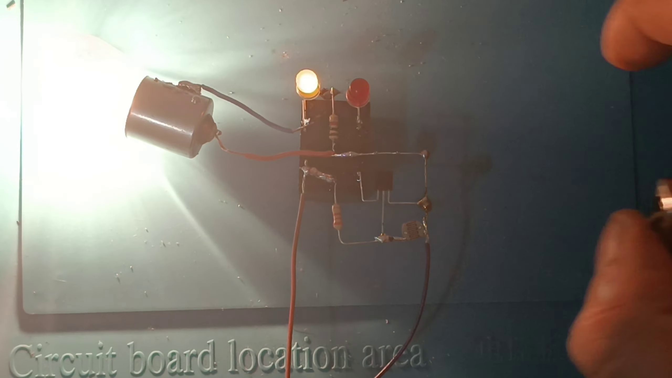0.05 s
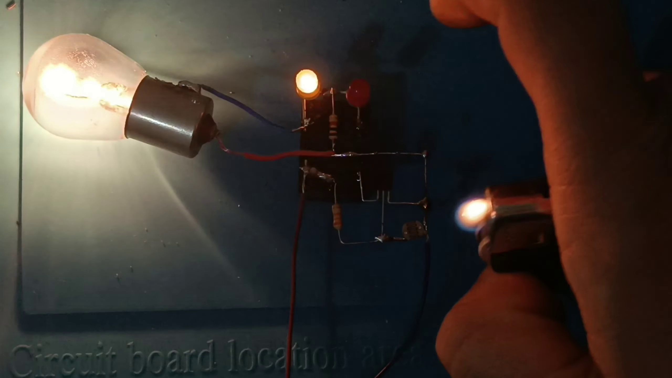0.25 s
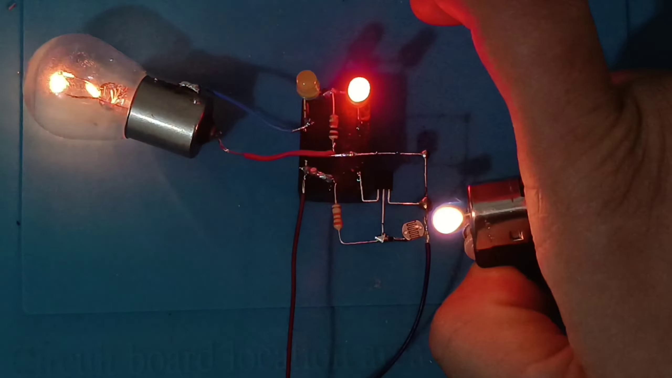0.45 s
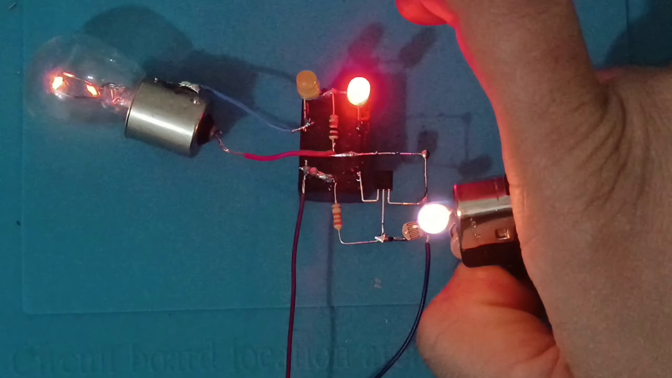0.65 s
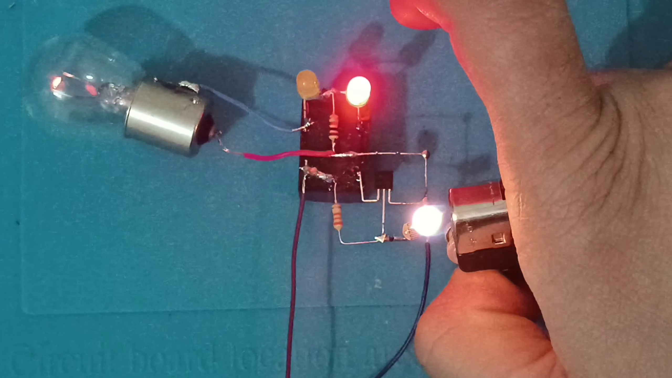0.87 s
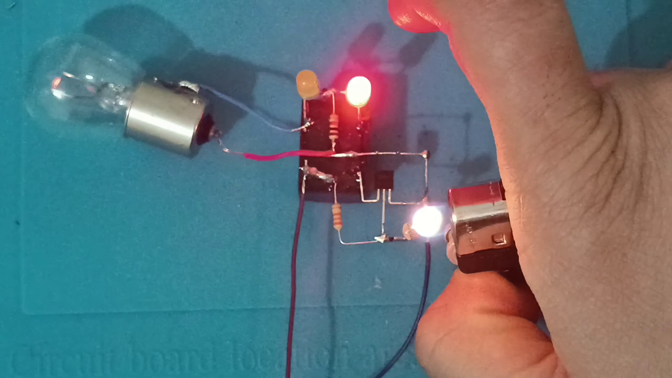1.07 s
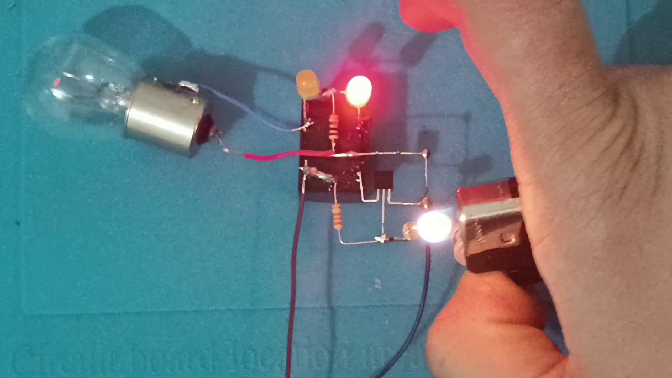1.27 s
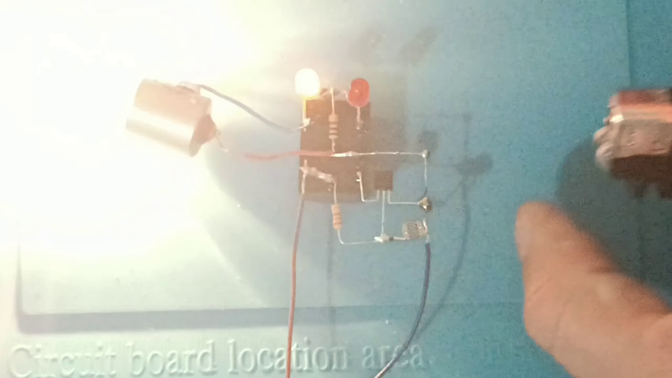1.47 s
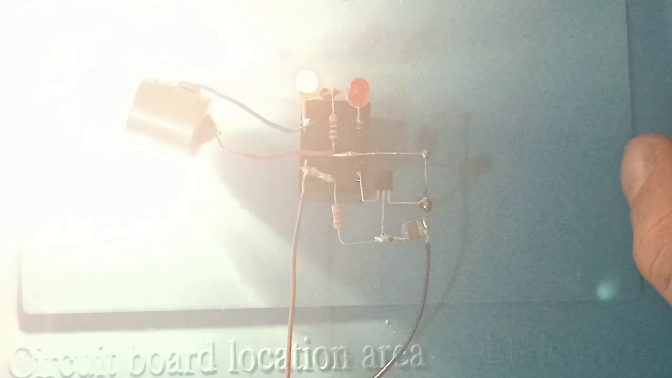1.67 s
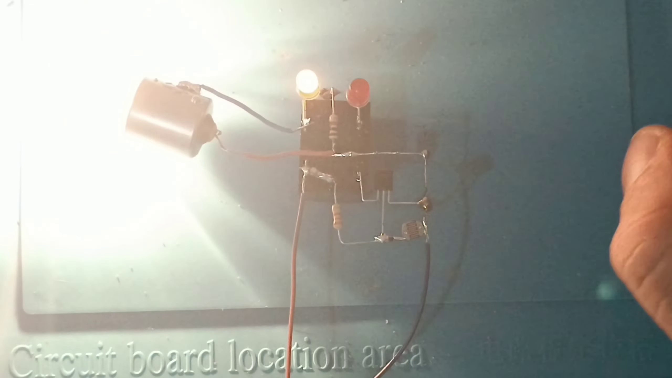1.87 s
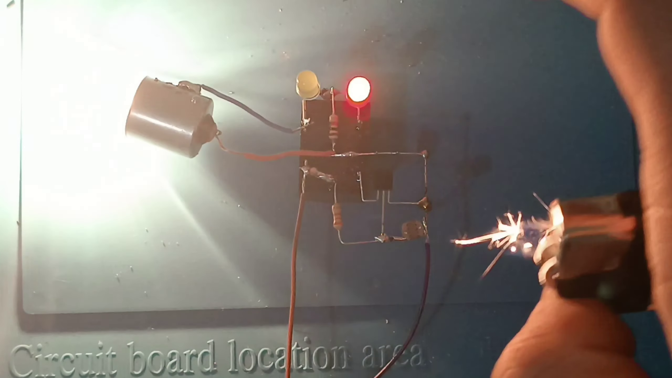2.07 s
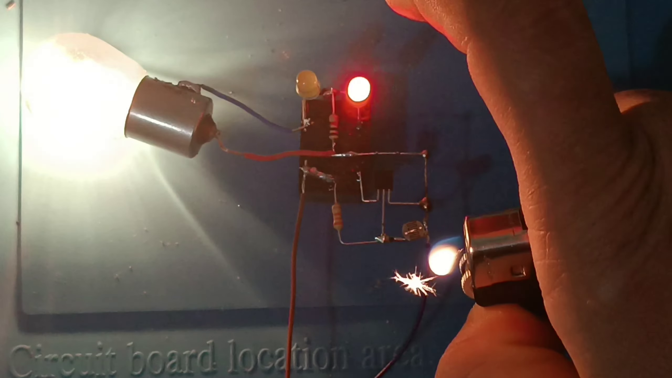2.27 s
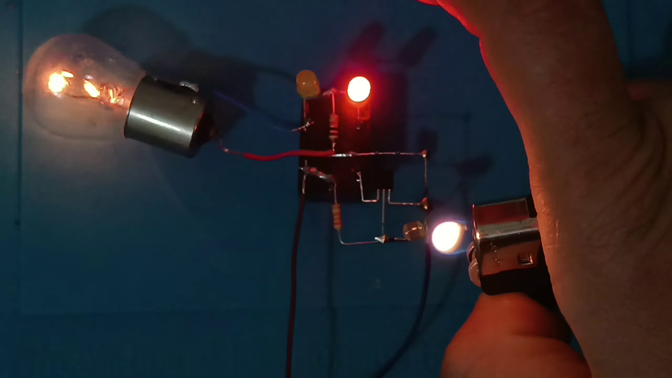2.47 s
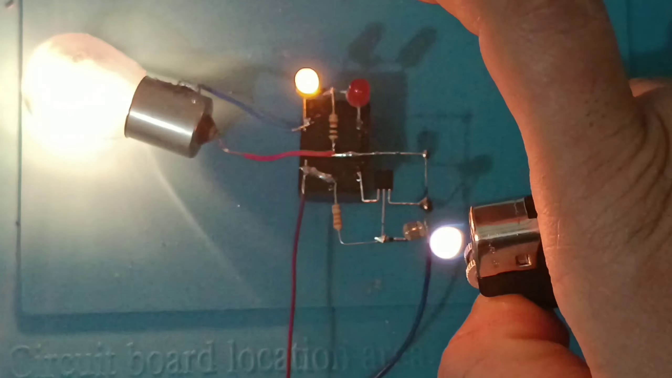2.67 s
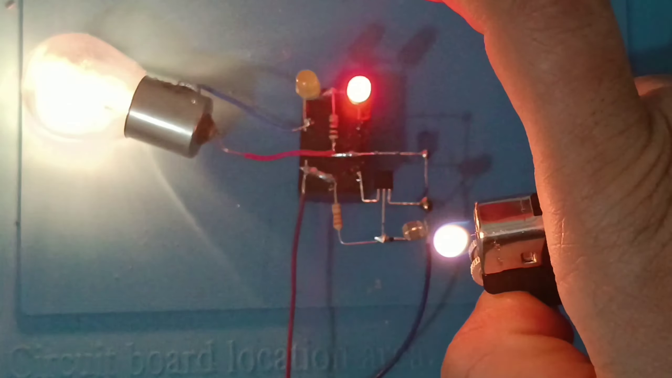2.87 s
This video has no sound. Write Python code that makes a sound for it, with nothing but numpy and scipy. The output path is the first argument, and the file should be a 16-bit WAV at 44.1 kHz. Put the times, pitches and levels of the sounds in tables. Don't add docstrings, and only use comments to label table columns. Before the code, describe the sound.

A flint lighter is struck close by at 0.2 seconds: short gritty scrape, sharp crack, low thumb thud on the table. Small dry relay clicks follow until 0.5. Quiet room hush, then a faint lever creak and clicks around 1.4, with a barely audible hollow hum. A second, slightly longer scrape comes at 2.16, a relay click at 2.26, lever snap at 2.35, then chattering relay clicks and low handling rumble from 2.6 to 2.9.

```python
import sys
import numpy as np
from scipy import signal
from scipy.fft import rfft, irfft, next_fast_len
from scipy.io import wavfile
from scipy.ndimage import map_coordinates

SR = 44100
rng = np.random.default_rng(int(sys.argv[2]) if len(sys.argv) > 2 else 0)


def boost(x):
    u = np.asarray(x, float) / 20
    return 10 ** u


def unload_audio(sound):
    columns = np.transpose(np.atleast_2d(sound))
    steps = np.round(np.clip(columns, -1, 1) * 32767)
    wavfile.write(sys.argv[1], SR, steps.astype(np.int16))


N = 127890


def unit(x):
    return x / np.sqrt(np.mean(x ** 2) + 1e-20)


def along(points, hz):
    f, v = np.transpose(points)
    return np.interp(np.log(hz + 1), np.log(f + 1), v)


def filtered(x, gain_db):
    m = 2 * next_fast_len(x.shape[-1] // 2 + 4096)
    gain = boost(gain_db(np.fft.rfftfreq(m, 1 / SR)))
    c = irfft(np.log(gain + 1e-6), m)
    c[1:m // 2] *= 2
    c[m // 2 + 1:] = 0
    return irfft(rfft(x, m) * np.exp(rfft(c)), m)[..., :x.shape[-1]]


def body(tone, peaks):
    def raw(f):
        rings = sum(db / (1 + (2 * (f - hz) / w) ** 2) for hz, w, db in peaks)
        return along(tone, f) + rings

    norm_db = 10 * np.log10(np.mean(boost(raw(np.linspace(0, SR / 2, 2048))) ** 2))
    return lambda f: raw(f) - norm_db


def add(track, s, sound):
    part = track[round(s * SR):][:len(sound)]
    part += sound[:len(part)]


def wobble(rate):
    knots = rng.standard_normal(int(N * rate / SR) + 4)
    return map_coordinates(knots, [np.arange(N) * rate / SR])


# (frequency [Hz], level per Hz [dB])
HUSH_TONE = [(25, -13), (65, -1), (300, -9), (700, -19), (2500, -21), (5000, -31.5), (9000, -42),
             (15300, -38.5)]
HUSH_DB, HUSH_LEFT_DB = -65.5, 1.04


def hush():
    noise = unit(filtered(rng.standard_normal((2, N)), lambda f: along(HUSH_TONE, f)))
    return boost(HUSH_DB + 4) * noise * boost([[HUSH_LEFT_DB / 2], [-HUSH_LEFT_DB / 2]])


# (time [s], level [dB])
HAND_PRESSURE = [(0, -66.5), (.15, -77), (1.25, -80), (1.42, -65), (1.65, -70), (1.8, -79), (2.55, -68),
                 (2.62, -58), (2.75, -65.5), (2.83, -58), (2.9, -73)]
# (frequency [Hz], level per Hz [dB])
HAND_TONE = [(50, -34), (100, 0), (170, 0), (300, -4), (450, -17.5), (900, -38)]


def hand():
    s, db = np.transpose(HAND_PRESSURE)
    rumble = unit(filtered(rng.standard_normal(N), lambda f: along(HAND_TONE, f)))
    return boost(np.interp(np.arange(N) / SR, s, db) + 2 * wobble(25)) * rumble


# (time [s], peak level [dB], time for the grit to fade by 60 dB [s], spark crack level [dB])
STRIKES = [
    (0.2244, -19.5, 0.048, 5.5),
    (2.1601, -21.5, 0.075, 6),
]
# (frequency [Hz], level per Hz [dB])
FLINT_TONE = [(71, -41), (120, -16), (353, -6.5), (1190, -12.5), (2750, -4.5), (3170, -5.5), (4760, -11.5),
              (5720, -8), (15500, -13)]
# (frequency [Hz], width [Hz], boost [dB])
SHELL = [(2550, 300, 3), (3630, 900, 4.5), (5670, 240, 7), (6300, 300, 2.5), (7180, 380, 0.5),
         (11900, 380, 2)]
WHEEL_START_DB, WHEEL_RISE_DB_PER_S = -9.5, 1123.5
GRIT_PER_S, GRIT_SPREAD_DB, GRIT_HISS = 6600, 7, 0.35


def lighter():
    rub = np.zeros(N)
    t = np.arange(SR // 8) / SR - SR // 20 / SR
    for s, db, t60, crack_db in STRIKES:
        chance = rng.random((len(t), 2))
        grain_level = boost(-GRIT_SPREAD_DB * np.log(chance[:, 1] + 0.01))
        grains = (chance[:, 0] < GRIT_PER_S / SR) * grain_level
        grit = (GRIT_HISS + unit(grains)) * rng.standard_normal(len(t))
        grit = unit(np.tanh(0.5 * unit(grit)))
        scrape = boost(WHEEL_START_DB + WHEEL_RISE_DB_PER_S * t)
        fading = boost(-60 * t / t60)
        crack = boost(crack_db - 60 * abs(t) / 0.0059)
        shape = np.where(t < 0, scrape, fading + crack)
        add(rub, s + t[0], boost(db - 4) * shape * grit)
    return filtered(rub, body(FLINT_TONE, SHELL))


# (frequency [Hz], level [dB], time to fade by 60 dB [s])
TABLE_TONES = [(106, -16.5, .5), (158.8, -5.5, 0.53), (184.8, -6, 0.36), (226, -13.5, 0.26), (297, 1, 0.13),
               (338.6, -4.5, 0.19), (379, -12.5, 0.17), (592, -13.5, 0.2), (766.4, -11.5, 0.099)]


def table(blows):
    t = np.arange(SR // 2) / SR
    ring = sum(boost(db - 60 * t / t60) * np.sin(2 * np.pi * hz * t) for hz, db, t60 in TABLE_TONES)
    return signal.fftconvolve(blows, ring * np.minimum(t / 0.0032, 1))[:N]


# (time [s], level [dB], push frequency [Hz], table ring level [dB])
THUDS = [
    (0.2542, -20, 227.7, -37),
    (2.1863, -27, 216, -44.5),
]
PUSH_RISE_S, PUSH_T60, PUSH_DB = 0.0038, 0.015, 15.5
REBOUND_S, REBOUND_DB = 0.00574, -8
EDGE_HZ, EDGE_DB = 700, -13.5


def thumb():
    thud, blows = np.zeros(N), np.zeros(N)
    t = np.arange(SR // 20) / SR
    for s, db, hz, ring_db in THUDS:
        tone = np.sin(2 * np.pi * hz * t) + boost(EDGE_DB) * np.sin(2 * np.pi * EDGE_HZ * t)
        push = boost(PUSH_DB - 60 * t / PUSH_T60) * tone * np.minimum(t / PUSH_RISE_S, 1) ** 2
        for lag, loss_db in [(0, 0), (REBOUND_S, REBOUND_DB)]:
            add(thud, s + lag, boost(db + loss_db) * push)
            add(blows, s + lag + 0.5 / hz, -boost([ring_db + loss_db]))
    return thud + table(blows)


# (time [s], peak level [dB], length of the bouncing [s], treble level [dB], table knock level [dB])
SNAPS = [(0.293, -32.5, .003, 0, -69.5), (0.3517, -34.5, 0.0026, 0.5, -72),
         (0.399, -50.5, 0.0033, 6, -52.5), (0.404, -44, 0.0084, -5, -67), (0.497, -51, .004, -2.5, -73),
         (1.4418, -41.5, 0.0023, 8, -67), (1.4434, -37, 0.0019, -1, -75.5), (1.4514, -31.5, 0.0076, 1, -60),
         (1.456, -38, 0.0069, -12, -72), (2.2522, -46.5, 0.0033, 15, -66), (2.2608, -24.5, 0.0014, 0, -75),
         (2.585, -39.5, .08, 2, -58.5), (2.7045, -38, .012, -1.5, -56), (2.7632, -40, .013, 1, -57),
         (2.848, -38, .012, 1.5, -58.5), (2.871, -42.5, .03, 0, -58), (2.886, -49, 0.014, -4.5, -71)]
# (frequency [Hz], level per Hz [dB])
RELAY_TONE = [(530, -42), (900, -19), (1860, -13.5), (2480, -2), (4440, -6), (4820, -10.5), (5630, 1.5),
              (8440, -10), (15500, -7)]
# (frequency [Hz], width [Hz], boost [dB])
CASE = [(2440, 770, 0.5), (5570, 580, -1), (7330, 340, 4), (10000, 900, 10), (14100, 1200, 5)]
CHATTER_PER_S, CHATTER_JITTER = 190, 0.15
CONTACT_SPREAD_DB, CONTACT_T60 = 1.3, 0.014
BUZZ_DB, BUZZ_SWELL_S, BUZZ_TREBLE_DB = -6.5, 0.021, -2
TREBLE_HZ = 8800


def relay():
    bass, treble, blows = np.zeros((3, N))
    t, u = np.arange(SR // 40) / SR, np.arange(SR // 8) / SR
    for s, db, length, treble_db, knock_db in SNAPS:
        swell = np.sqrt(np.minimum(u / BUZZ_SWELL_S, 1)) * np.clip((length - u) / 0.0018, 0, 1)
        buzz = boost(db + BUZZ_DB) * swell * rng.standard_normal(len(u))
        add(bass, s, buzz)
        add(treble, s, boost(treble_db + BUZZ_TREBLE_DB) * buzz)
        gap_luck, spreads, taps = rng.standard_normal((3, 32))
        times = np.cumsum(np.exp(CHATTER_JITTER * gap_luck)) / CHATTER_PER_S
        for at, spread, tap in zip(times - times[0], spreads, taps):
            fit = np.clip((length - at) * CHATTER_PER_S + (at == 0), 0, 1)
            level_db = db - 5.5 + CONTACT_SPREAD_DB * spread * (at > 0)
            crack = fit * boost(level_db - 60 * t / CONTACT_T60) * rng.standard_normal(len(t))
            if s + at < N / SR:
                add(bass, s + at, crack)
                add(treble, s + at, boost(treble_db) * crack)
                add(blows, s + at, fit * np.tanh(tap) * boost([knock_db]))
    low = filtered(bass, lambda f: -10 * np.log10(1 + (f / TREBLE_HZ) ** 8))
    high = filtered(treble, lambda f: -10 * np.log10(1 + (TREBLE_HZ / (f + 1)) ** 8))
    return filtered(low + high, body(RELAY_TONE, CASE)), table(blows)


# (time [s], length [s], level [dB])
CREAKS = [
    (1.395, 0.0162, -54.5),
    (1.416, 0.0109, -53),
]
CREAK_HZ, CREAK_WIDTH_HZ, CREAK_RUB_DB = 3270, 520, -4.5


def creak():
    t, gate = np.arange(N) / SR, np.zeros(N)
    for s, length, db in CREAKS:
        gate += boost(db) * np.clip(np.minimum(t - s, s + length - t) / 0.0024, 0, 1)
    tone = [(300, -30), (1000, CREAK_RUB_DB), (5000, CREAK_RUB_DB - 0.5), (15000, -23)]
    rub = gate * boost(1.9 * wobble(540)) * rng.standard_normal(N)
    return filtered(rub, body(tone, [(CREAK_HZ, CREAK_WIDTH_HZ, 14)]))


PIPE_S, PIPE_RISE_S, PIPE_T60 = 1.52, 0.034, 2.4
PIPE_HZ, PIPE_WIDTH_HZ, PIPE_DB = 581, 15, -67


def hum():
    t = np.arange(N) / SR - PIPE_S

    def drone():
        tone = np.sin(2 * np.pi * PIPE_HZ * t + 0.43 * wobble(PIPE_WIDTH_HZ))
        return tone * boost(2.9 * wobble(PIPE_WIDTH_HZ))

    swell = np.clip(t / PIPE_RISE_S, 0, 1)
    return boost(PIPE_DB - 60 * abs(t) / PIPE_T60) * swell * np.array([drone(), drone()])


# (time [s], peak level [dB], time to fade by 60 dB [s])
RELEASE = [
    (2.3515, -25.5, 0.036),
    (2.3572, -27, 0.019),
    (2.3610, -33, 0.087),
]
# (frequency [Hz], level per Hz [dB])
LEVER_TONE = [(150, -41.5), (250, -2.5), (378, -7.5), (1560, -15), (2570, -1), (4100, -8.5), (5600, -2.5),
              (6770, -5.5), (15500, -18.5)]
# (frequency [Hz], width [Hz], boost [dB])
LEVER_RINGS = [(2650, 300, 2), (4160, 750, -5.5), (5640, 240, 8), (7450, 300, 4.5)]


def lever():
    hits, t = np.zeros(N), np.arange(SR // 20) / SR
    for s, db, t60 in RELEASE:
        add(hits, s, boost(db - 6 - 60 * t / t60) * rng.standard_normal(len(t)))
    return filtered(hits, body(LEVER_TONE, LEVER_RINGS))


# (frequency [Hz], time to fade by 60 dB [s])
ROOM_FADE = [(100, 0.68), (400, 0.49), (2000, 0.44), (6000, 0.31), (15000, 0.17)]
ROOM_GAP_S, ROOM_MONO_HZ = 0.0032, 433.6


def room(x):
    hz, t, z = signal.stft(rng.standard_normal((2, SR // 2)), SR, nperseg=256)
    turn = np.pi / 4 / (1 + (ROOM_MONO_HZ / (hz[:, None] + 1)) ** 2)
    z = np.cos(turn) * z[0] + np.array([np.sin(turn) * z[1], -np.sin(turn) * z[1]])
    fade = boost(-60 * t / along(ROOM_FADE, hz)[:, None])
    tail = signal.istft(z * fade, SR, nperseg=256)[1]
    late = np.pad(x, (round(ROOM_GAP_S * SR), 0))[None]
    return signal.fftconvolve(late, tail / np.linalg.norm(tail[0]), axes=1)[:, :N]


# (frequency [Hz], left minus right level [dB])
PORT_TILT = [(500, 1), (1300, 2), (2400, -1), (6000, -7), (8500, 1.5), (11000, 14.5), (15000, 28)]


def ports(x, share):
    left = filtered(x[0], lambda f: share * along(PORT_TILT, f) / 2)
    right = filtered(x[1], lambda f: -share * along(PORT_TILT, f) / 2)
    return np.array([left, right])


def scattered(x):
    hz = np.fft.rfftfreq(N, 1 / SR)
    turn = map_coordinates(rng.standard_normal(64), [hz / 800]) * hz / (hz + 1200)
    return irfft(rfft(x) * np.exp(1j * 1.39 * turn), N)


ROOM_DB, TABLE_ROOM_DB, ROOM_TREBLE_SHARE = -4, -6.5, 0.44


def scene():
    clicks, taps = relay()
    flint, slap = lighter() + creak(), lever()
    wood = thumb() + taps + hand()
    air = flint + slap + clicks
    near = ports([air, scattered(air)], 0.65)
    first = np.arange(N) < N // 3
    echoes = room(flint * first + slap) + room(flint * ~first) + room(clicks)
    far = ports(echoes, ROOM_TREBLE_SHARE)
    return near + boost(ROOM_DB) * far + wood + boost(TABLE_ROOM_DB) * room(wood) + hum() + hush()


def low_pass(x):
    return signal.sosfilt(signal.butter(12, 16670, fs=SR, output="sos"), x)


# (frequency [Hz], level [dB])
MIC = [(20, -20.5), (70, -0.5), (15400, -1.5), (15900, -25), (16600, -50), (17000, -55)]


def record(dry):
    mix = filtered(dry, lambda f: along(MIC, f))
    return low_pass(mix)


dry = scene()
out = record(dry)
unload_audio(out)
```